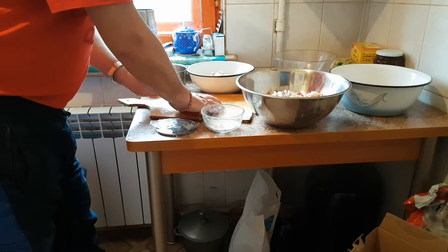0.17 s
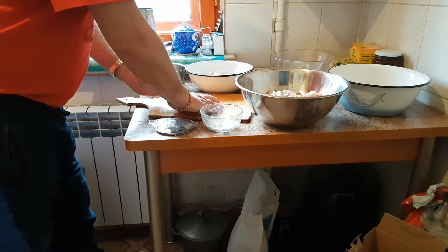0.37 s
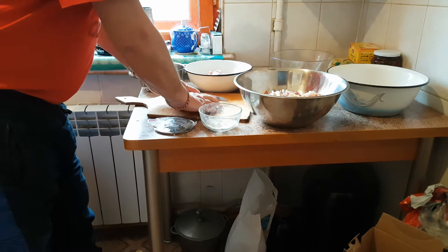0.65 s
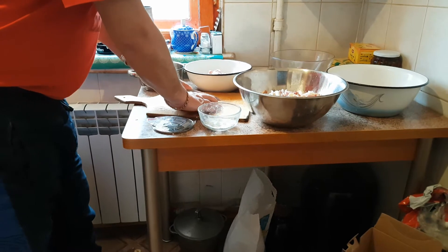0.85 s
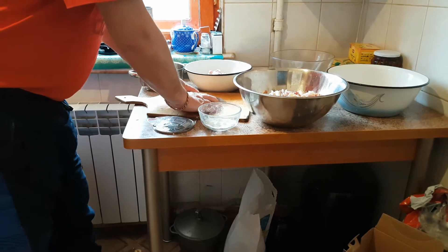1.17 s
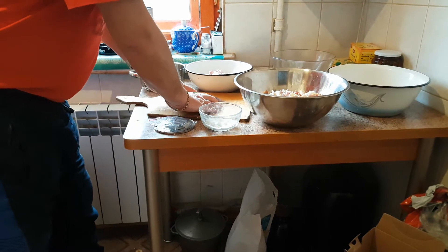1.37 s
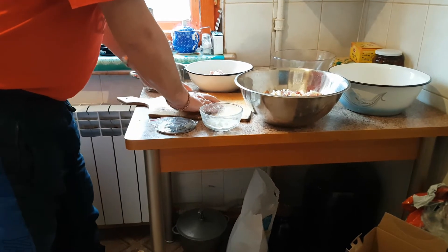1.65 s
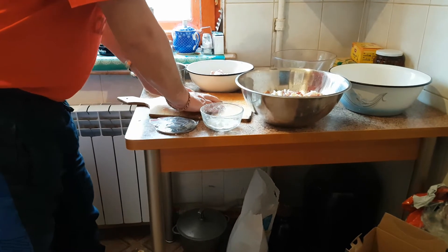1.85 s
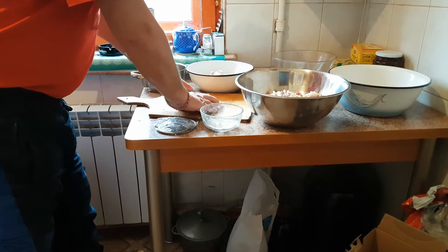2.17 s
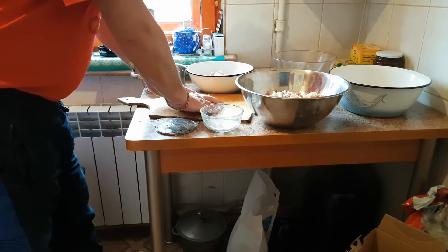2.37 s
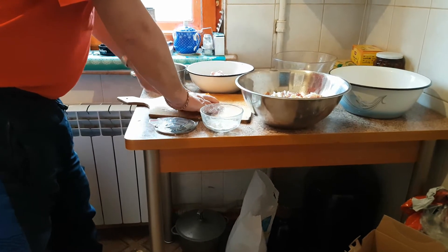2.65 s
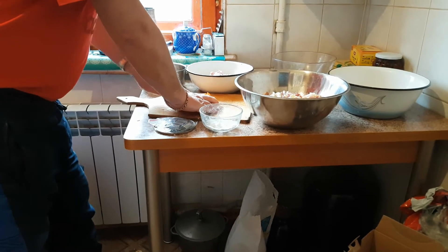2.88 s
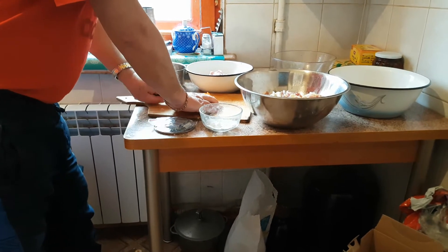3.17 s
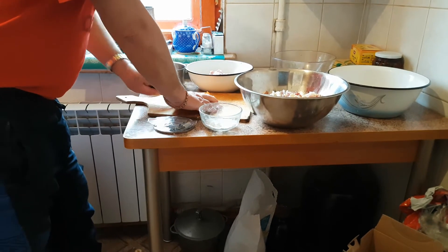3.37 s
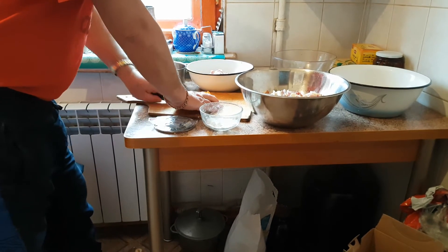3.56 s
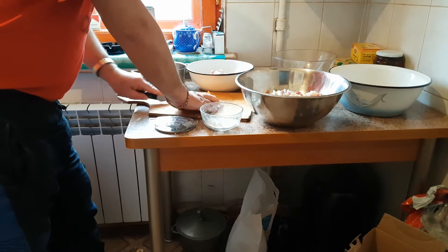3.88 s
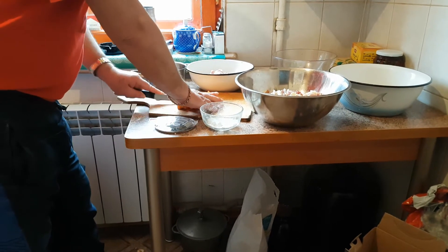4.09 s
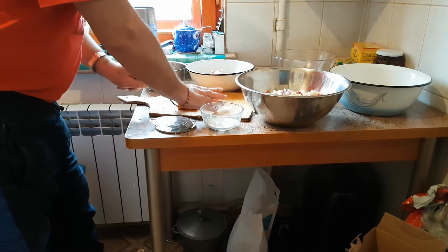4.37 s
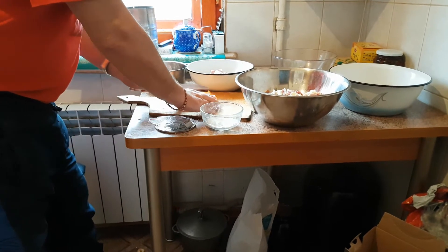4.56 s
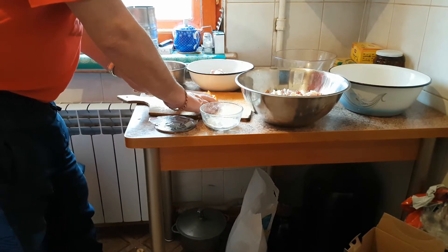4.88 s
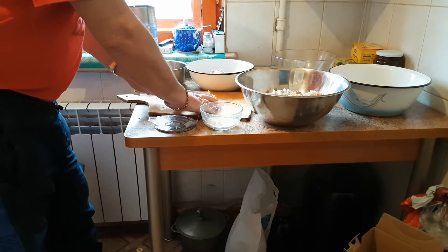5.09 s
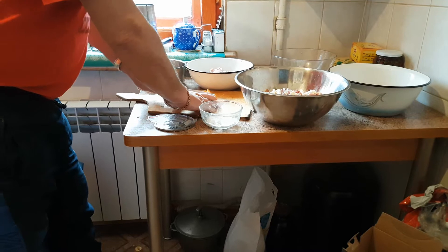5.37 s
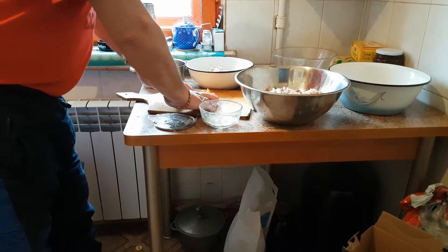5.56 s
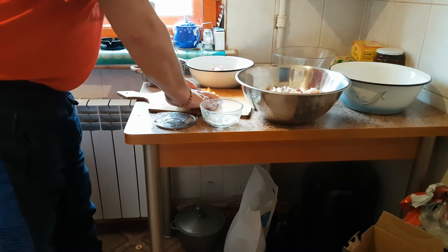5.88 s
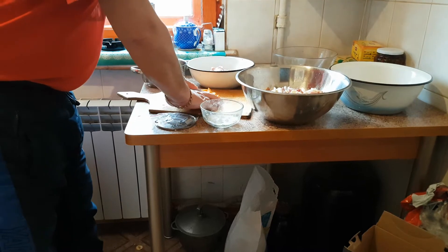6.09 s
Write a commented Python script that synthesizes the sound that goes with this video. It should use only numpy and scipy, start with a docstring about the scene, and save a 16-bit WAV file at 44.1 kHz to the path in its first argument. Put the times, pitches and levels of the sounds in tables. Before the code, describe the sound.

A knife cuts meat on a wooden board in a small tiled kitchen, with faint scrapes and ticks and two hard wooden knocks.

```python
"""Cutting meat on a wooden board

Meat is cut up on a wooden board on a table in a small tiled kitchen. The knife drags and crackles
through it, ticks on the wood and twice breaks through with a hard knock; the table thuds softly.
Blows and random stick-slip grains excite the resonances of board, blade and table.
An appliance hums as a sum of wavering tones, over room air of shaped noise and a faint high whine."""
import sys
import numpy as np
from scipy import signal
from scipy.fft import rfft, irfft
from scipy.io import wavfile
from scipy.ndimage import uniform_filter1d, minimum_filter1d

SR = 44100
rng = np.random.default_rng(int(sys.argv[2]) if len(sys.argv) > 2 else 0)


def wrap_up_sound(samples):
    """Save the sound to the file named by the first command line argument, as 16-bit audio."""
    columns = np.atleast_2d(samples).T
    # keep every value between -1 and 1, then stretch to whole-number steps
    tamed = np.clip(columns, -1, 1)
    steps = np.round(tamed * 32767).astype(np.int16)
    wavfile.write(sys.argv[1], SR, steps)


N = 274946
TIME = np.arange(N) / SR  # s

# All levels are relative: each source adds its own gain.
# Blade coming down hard on the board: t/s, force level/dB, contact sharpness f/Hz, left minus right level/dB
CHOP_BLOWS = [(2.692, -18, 2020, -1), (2.695, -7, 1020, 1), (2.7852, -35.5, 8850, 1.5),
              (3.6053, -7.5, 3524, -0.5)]
# Sharp touches of the blade: t/s, knock level/dB, steel tick level/dB
BLADE_TICKS = [(0.971, -40, -83), (1.038, -31, -35.5), (1.068, -27, -30), (1.226, -35.5, -80),
               (2.261, -43.5, -45), (2.304, -26.5, -35), (2.345, -27.5, -37.5), (2.389, -24, -41),
               (4.613, -56.5, -58), (4.899, -60.5, -64), (5.521, -43.5, -54), (5.981, -49.5, -66.5)]
# Strokes that part the fibres: start t/s, length t/s, board level/dB, wet crackle level/dB,
# crackle top f/Hz, stick-slip pitch f/Hz
SLICE_STROKES = [(0.637, 0.031, -41.5, -47, 17300, 1670), (1.03, 0.015, -46, -37.5, 11000, 1930),
                 (1.074, 0.031, -50, -37.5, 9500, 1990), (1.882, 0.032, -45.5, -56, 14000, 1700),
                 (2.306, 0.099, -43, -46.5, 10100, 2450), (2.676, 0.021, -29, -34, 10100, 1230),
                 (2.755, 0.037, -42, -40, 7950, 1180), (3.138, 0.062, -50, -63.5, 13000, 2220),
                 (3.562, 0.083, -43, -38, 10950, 1880)]
# Meat or blade pushed across the board: start t/s, length t/s, rub level/dB, hollow note level/dB;
# levels hold at the end of the push
DRAG_PUSHES = [(0.305, 0.36, -54.5, -75), (0.793, 0.11, -67, -88), (1.421, 0.084, -71, -75),
               (1.593, 0.14, -64.5, -83), (1.829, 0.066, -60, -76), (2.018, 0.084, -71, -84),
               (2.237, 0.093, -53.5, -62), (2.49, 0.06, -60, -73), (3.835, 0.12, -52.5, -42),
               (5.345, 0.11, -60.5, -64.5), (5.528, 0.26, -55.5, -56)]
# Hollow note of the rubbed board: f/Hz, level/dB
HOLLOW_NOTE = [(1030, -4), (1750, -9.5), (2600, -8.5)]
# Fingers working the meat between the cuts: from t/s, to t/s, level/dB
FINGER_WORK = (0.2, 4.3, -70)
# Spectrum of a hard knock: f/Hz, level/dB
KNOCK_SPECTRUM = [(100, -28), (390, -29.5), (490, -11.5), (800, -7.5), (1100, -1), (1700, -2), (2600, -5.5),
                  (3300, -5.5), (4300, -15.5), (5300, -7.5), (7800, -6), (9200, -16), (15000, -24.5)]
# Broad, quickly damped resonances of the board: f/Hz, level/dB, 60 dB decay t/s
WOOD_MODES = [(503, -14, 0.13), (709, -18.5, 0.028), (1031, -7.5, 0.043), (1103, -7, 0.057),
              (1500, 0, 0.018), (1740, 2, .02), (2247, -1, 0.018), (2450, 3.5, 0.017), (2958, -9.5, 0.0061),
              (5276, -13.5, 0.0059), (8000, -16.5, 0.0049)]
# Spectrum of the struck or scraped blade: f/Hz, level/dB
STEEL_SPECTRUM = [(1000, -17.5), (3000, 0.5), (4200, -4), (5400, 2), (6500, -3), (8000, 2), (9200, -9.5),
                  (12500, -6), (15500, -12)]
# Spectrum of the rubbed board surface: f/Hz, level/dB
RUB_SPECTRUM = [(150, -12.5), (450, -6.5), (750, -1), (1050, 0.5), (1400, -7.5), (1900, -2), (2700, -5.5),
                (3600, -13.5), (5400, -14), (7800, -15), (9500, -20.5), (15000, -22)]
# Lasting ring of board and table top: f/Hz, level/dB
BOARD_MODES = [(969.0, -59), (1023, -42.5), (1136, -33.5), (1168, -40.5), (1217, -33.5), (1292, -61),
               (1373, -63.5), (1486, -46), (1577, -37), (1814, -51), (1857, -48.5), (2030, -51.5),
               (2078, -46.5), (2218, -52), (2299, -40.5), (2353, -40.5), (2390, -41), (2482, -41.5),
               (2530, -41.5), (2643, -48), (2729, -45), (2815, -43), (2853, -42), (3042, -58), (3155, -57),
               (3235, -57.5)]
# Hands pressing on the table: t/s, level/dB
HAND_THUDS = [(0.863, -53.5), (1.014, -52), (1.613, -44.5), (2.021, -51.5), (2.147, -56), (2.407, -44.5),
              (2.793, -41), (3.186, -38.5), (3.339, -49), (4, -45), (6.085, -51)]
# Low modes of the table: f/Hz, level/dB, 60 dB decay t/s
TABLE_MODES = [(80, -14.5, .25), (114, -8.5, 0.15), (138.2, 0.5, 0.19), (156, -6, 0.062),
               (253.6, -8.5, 0.12), (486, -14.5, 0.063)]
# First reflections off wall, floor and ceiling: delay t/s, level/dB
FIRST_ECHOES = [(.0068, -4), (0.0135, -15.5), (0.0223, -9), (.0338, -8)]
# Reverberation time of the kitchen: f/Hz, 60 dB decay t/s
REVERB_TIME = [(120, 0.5), (500, 0.2477), (1100, 0.3181), (2500, 0.3024), (6000, 0.2672), (13000, 0.2161)]
# Left-right correlation of the diffuse field: f/Hz, coefficient (no unit)
FIELD_LIKENESS = [(100, 0.89), (250, 0.8), (500, 0.58), (1000, .1), (3000, 0.0018), (12000, 0.071)]
# Appliance hum: f/Hz, level/dB
HUM_TONES = [(96.9, -77.5), (290.7, -79), (344.5, -85), (586.8, -85.5), (829.0, -90)]
# Spectrum of the room air: f/Hz, level/dB
AIR_SPECTRUM = [(20, -2.5), (60, -3), (100, -0.5), (180, -5.5), (280, -6.5), (450, -12), (750, -13),
                (1300, -16.5), (1900, -17.5), (2600, -16), (3600, -27.5), (7000, -31.5), (9500, -34.5),
                (16000, -32.5)]
# Microphone balance: f/Hz, left minus right level/dB
MIC_BALANCE = [(100, -0.2), (550, -1), (1100, 1), (2200, -6.5), (4500, -8), (10000, -3)]

# Every push takes hold, bears down harder and harder, then lets go
GRIP_S, SWELL_DB_PER_S, LET_GO_S = 0.025, 38, 0.0085
# A chop jolts the table too; after each push the table rocks back, weaker every time
CHOP_JOLT_DB, ROCK_S, ROCK_LOSS_DB = -30.5, 0.057, 10.5
WHINE_HZ, WHINE_DB = 3993, -88
CUTOFF_HZ = 15900


def chops():
    """Impact: a contact softened by meat lengthens the force pulse and so lowers its upper frequency."""
    force = 0
    for s, db, sharpness_hz, pan_db in CHOP_BLOWS:
        contact = signal.butter(2, sharpness_hz, fs=SR, output="sos")
        push = signal.sosfilt(contact, clicks([s], [db]) + 1e-18)
        force = force + push * from_db([[pan_db / 2], [-pan_db / 2]])
    return force


def cutting(knock_db, tick_db, slip_db, slip_width_hz):
    """Fracture and stick-slip: parting fibres give bursts of grains that drive wood, steel and a rough note."""
    s, wood_db, steel_db = np.transpose(BLADE_TICKS)
    on_wood = band(clicks(s, wood_db + knock_db), low_hz=450, high_hz=6700)
    on_steel = clicks(s, steel_db + tick_db)
    slip = 0
    fibres = grains(per_s=1600, spread_db=7.0)
    for start, length, board_db, crackle_db, top_hz, slip_hz in SLICE_STROKES:
        progress = np.clip((TIME - start) / length, 0, 1)
        stroke = fibres * np.sqrt(np.abs(np.sin(np.pi * progress)))
        crackle = signal.lfilter(*signal.butter(1, top_hz, fs=SR), stroke + 1e-18)
        on_wood = on_wood + from_db(board_db) * stroke
        on_steel = on_steel + from_db(crackle_db) * crackle
        # the note follows the level of the crackle
        slip = slip + from_db(crackle_db + slip_db) * slip_note(stroke, slip_hz, slip_width_hz)
    return on_wood, on_steel, slip


def dragging(note_width_hz):
    """Friction: dense small slips rub the board and give each push a hollow note; fingers rustle faintly."""
    slips = grains(per_s=2600, spread_db=7.0)
    begin, end, fingers_db = FINGER_WORK
    working = 1.0 * ((TIME > begin) & (TIME < end))
    rub = from_db(fingers_db) * slips * uniform_filter1d(working, size=SR // 5)
    grip = 0
    for start, length, rub_db, note_db in DRAG_PUSHES:
        push = slips * pressure(start, length)
        rub = rub + from_db(rub_db) * push
        grip = grip + from_db(note_db) * push
    note = sum(from_db(db) * slip_note(grip, hz, note_width_hz) for hz, db in HOLLOW_NOTE)
    return rub, note


def pressure(start, length):
    """Normal force of one push: linear onset, exponential swell towards 1, exponential release."""
    past_end = TIME - start - length
    hold = np.clip((TIME - start) / GRIP_S, 0, 1)
    swell = from_db(SWELL_DB_PER_S * np.minimum(past_end, 0))
    release = np.exp(-np.clip(past_end / LET_GO_S, 0, 20))
    return hold * swell * release


def grains(per_s, spread_db):
    """Stick-slip as a random point process: tiny slips of uneven size and either sign; rms 1."""
    sizes = from_db(spread_db * np.minimum(rng.exponential(1, N), 4)) * rng.choice([-1, 1], N)
    return rms_one(sizes * (rng.random(N) < per_s / SR))


def slip_note(slips, hz, width_hz):
    """Stick-slip periodicity: a band round one pitch, with gain that makes up for the narrow width."""
    return np.sqrt(SR / 2 / width_hz) * band(slips, max(hz - width_hz / 2, 100), hz + width_hz / 2)


def wood():
    """Modal superposition: damped resonances of alternating sign form the board's short hollow note."""
    t = TIME[:SR // 10]
    note = 0
    for k, (hz, db, t60) in enumerate(WOOD_MODES):
        note = note + (-1) ** k * from_db(db - 60 * t / t60) * np.sin(2 * np.pi * hz * t)
    return unit_energy(note)


def board_ring(force, level_db, t60):
    """Free vibration: modes of board and table top ring on, with signs drawn separately for each port."""
    modes = [(hz, db, t60) for hz, db in BOARD_MODES]
    return from_db(level_db) * band(convolve(force, [ringing(modes), ringing(modes)]), 420, 4500)


def ringing(modes):
    """Modal decay: damped sines of random sign; energy 1."""
    t = TIME[:SR // 2]
    ring = 0
    for hz, db, t60 in modes:
        ring = ring + rng.choice([-1, 1]) * from_db(db - 60 * t / t60) * np.sin(2 * np.pi * hz * t)
    return unit_energy(ring)


def thuds(level_db, low_hz, soft_hz, rumble_db, rumble_s):
    """Soft excitation: slow pushes drive the low table modes; it rocks back twice and rumbles briefly."""
    jolts = [(s, db + CHOP_JOLT_DB) for s, db, _, _ in CHOP_BLOWS]
    s, db = np.transpose(HAND_THUDS + jolts)
    pushes = clicks(s, db + level_db)
    period = ROCK_S * rng.uniform(0.75, 1.15, len(s))
    rocking = 0
    for k in (1, 2):
        returns = np.minimum(s + k * period, TIME[-1])
        rocking = rocking + clicks(returns, db + level_db - k * ROCK_LOSS_DB)
    # frame and floor: decaying low noise
    rumble = rms_one(band(rng.standard_normal(N), 60, 259.5))
    shaking = convolve(pushes, np.exp(-TIME[:SR] / rumble_s)) * rumble
    thud = convolve(band(pushes + rocking, low_hz, soft_hz), ringing(TABLE_MODES))
    # level_db is already in the pushes, so the rumble takes it off again
    return thud + from_db(rumble_db - level_db) * shaking


def kitchen(direct_db, echo_db, build_s, early_db, early_s):
    """Room response: direct sound, strong echoes, scatter off bowls and tiles, a tail dying band by band."""
    t = TIME[:SR // 2]
    noise = rfft(diffuse(rng.standard_normal((2, len(t)))))
    hz = np.arange(noise.shape[-1]) * SR / len(t)
    centres = np.geomspace(60, 16000, 12)
    tail = 0
    for centre, pick in zip(centres, np.eye(len(centres))):
        part = irfft(noise * np.interp(hz, centres, pick), len(t))
        tail = tail + part * from_db(-60 * t / at_hz(REVERB_TIME, centre))
    tail = unit_energy(tail * (1 - np.exp(-t / build_s)))
    scatter = rng.standard_normal((2, len(t))) * (rng.random((2, len(t))) < 2500 / SR)
    early = unit_energy(diffuse(scatter) * np.exp(-t / early_s))
    # the board lies a little to the left, so the right port hears it 4 samples later
    direct = np.array([np.arange(len(t)) == lag for lag in (0, 4)])
    delays, levels_db = np.transpose(FIRST_ECHOES)
    echoes = []
    for ear in range(2):
        # each echo comes from its own direction
        arrivals = delays + rng.uniform(-0.00032, 0.00047, len(delays))
        echoes.append(clicks(arrivals, levels_db + echo_db)[:len(t)])
    # the reflections have lost some treble
    echoes = band(np.array(echoes), 82, 3500)
    return unit_energy(tail + from_db(early_db) * early + from_db(direct_db) * direct + echoes)


def diffuse(pair):
    """Diffuse-field coherence: two unrelated signals become alike in the bass, unrelated in the treble."""
    size = pair.shape[-1]
    mid, side = rfft(pair)
    alike = np.clip(at_hz(FIELD_LIKENESS, np.arange(len(mid)) * SR / size), -1, 1)
    return irfft(np.sqrt(1 + alike) * mid + np.sqrt(1 - alike) * side * [[1], [-1]], size)


def background(air_db, hum_db, waver):
    """Stationary sources: room air as filtered noise, a wavering hum and a faint high whine."""
    hum = 0
    for hz, db in HUM_TONES:
        hum = hum + from_db(db + hum_db) * rms_one(wavering_tone(hz, waver, count=40))
    whine = np.array([wavering_tone(WHINE_HZ, 0.73, count=600) for ear in range(2)])
    air = rms_one(convolve(diffuse(rng.standard_normal((2, N))), causal(AIR_SPECTRUM)))
    return from_db(air_db) * air + hum + from_db(WHINE_DB) * rms_one(whine)


def wavering_tone(hz, depth, count):
    """Random modulation: a complex envelope through `count` random knots wavers level and phase."""
    knots = rng.standard_normal(count) + 1j * rng.standard_normal(count)
    wobble = np.interp(TIME, np.linspace(0, TIME[-1], count), knots)
    return np.real((1 + depth * wobble) * np.exp(2j * np.pi * hz * TIME))


def from_db(db):
    """Level law: decibels to amplitude gain."""
    return 10 ** (np.asarray(db) / 20)


def rms_one(x):
    """Power normalisation: scale to rms 1."""
    return x / np.sqrt(np.mean(x ** 2) + 1e-20)


def unit_energy(x):
    """Energy normalisation: scale a response to mean energy 1 per channel."""
    return rms_one(x) / np.sqrt(x.shape[-1])


def at_hz(points, hz):
    """Logarithmic frequency scale: interpolate a table along log f."""
    points = np.array(points)
    return np.interp(np.log(hz + 1e-9), np.log(points[:, 0]), points[:, 1])


def convolve(x, response):
    """Linear superposition: pass a sound through a response."""
    return signal.fftconvolve(np.atleast_2d(x), np.atleast_2d(response), axes=-1)[:, :N]


def causal(spectrum, size=4096):
    """Minimum phase: fold the cepstrum to get the most compact causal response with a given spectrum."""
    gain = from_db(at_hz(spectrum, np.arange(size // 2 + 1) * SR / size))
    cepstrum = irfft(np.log(gain))
    cepstrum[1:size // 2] *= 2
    cepstrum[size // 2 + 1:] = 0
    return irfft(np.exp(rfft(cepstrum)))


def clicks(times, level_db):
    """Ideal impulse: one single-sample click at each time."""
    out = np.zeros(N)
    np.add.at(out, np.round(np.asarray(times) * SR).astype(int), from_db(level_db))
    return out


def band(x, low_hz, high_hz):
    """Band limitation: Butterworth band-pass; the tiny offset keeps silence from slowing the filter."""
    sos = signal.butter(2, [low_hz, high_hz], "band", fs=SR, output="sos")
    return signal.sosfilt(sos, x + 1e-18)


def scene():
    """Source, resonator, room: knife and board sound through the kitchen; ring, table and background add."""
    blows = chops()
    on_wood, on_steel, slip = cutting(knock_db=19, tick_db=21.5, slip_db=-5.5, slip_width_hz=600)
    rub, note = dragging(note_width_hz=426)
    crack = from_db(28.5) * convolve(blows, unit_energy(causal(KNOCK_SPECTRUM)))
    board_force = from_db(24.5) * blows + from_db(-7.5) * on_wood
    board = band(convolve(board_force, wood()), 420, 10000)
    surface = convolve(from_db(-3.5) * on_wood + rub, unit_energy(causal(RUB_SPECTRUM))) + note
    blade = convolve(on_steel, unit_energy(causal(STEEL_SPECTRUM))) + slip
    room = kitchen(direct_db=-1.5, echo_db=-4, build_s=0.018, early_db=1.0, early_s=0.026)
    ring_force = blows + from_db(-27.5) * (on_wood + rub)
    ring = board_ring(ring_force, level_db=24.5, t60=0.2)
    table = thuds(level_db=28, low_hz=70.5, soft_hz=240, rumble_db=-16, rumble_s=0.062)
    in_room = convolve(crack + board + surface + blade, room)
    return in_room + ring + table + background(air_db=-62.5, hum_db=5, waver=0.19)


def record(dry):
    """Transducer chain: brighter right microphone, thinned deep bass, peak limiter, steep treble cut."""
    ports = [causal([(hz, side * db / 2) for hz, db in MIC_BALANCE]) for side in (1, -1)]
    bass_cut = signal.butter(2, 46, "high", fs=SR, output="sos")
    thinned = signal.sosfilt(bass_cut, convolve(dry, ports))
    allowed = .9 / np.maximum(np.abs(thinned).max(axis=0), .9)
    # the lowest nearby gain, smoothed, serves both channels
    gain = uniform_filter1d(minimum_filter1d(allowed, size=91), size=91)
    treble_cut = signal.ellip(10, .1, 80, CUTOFF_HZ, fs=SR, output="sos")
    return signal.sosfilt(treble_cut, gain * thinned)


dry = scene()
out = record(dry)
wrap_up_sound(out)
```